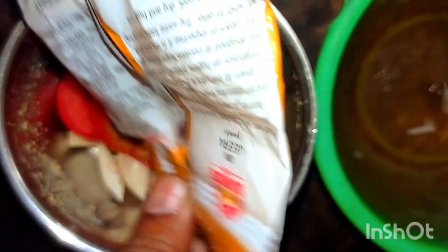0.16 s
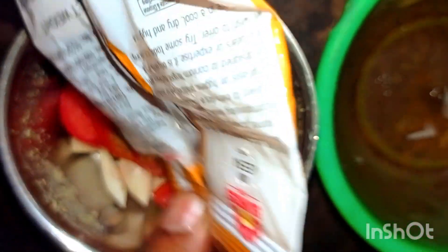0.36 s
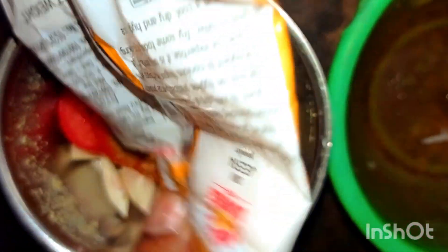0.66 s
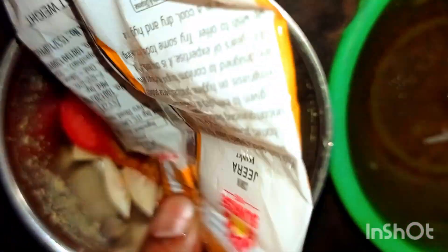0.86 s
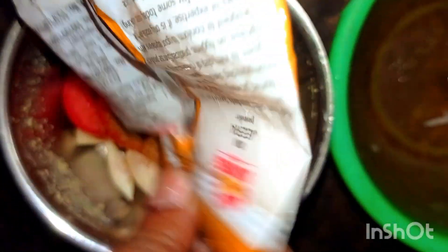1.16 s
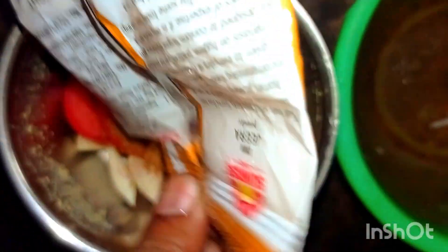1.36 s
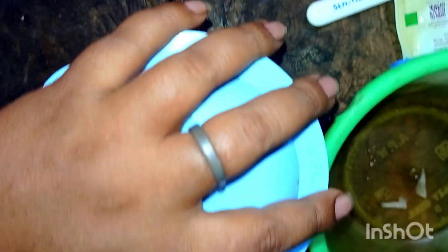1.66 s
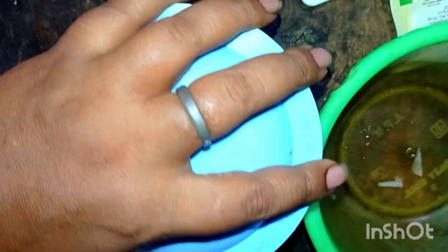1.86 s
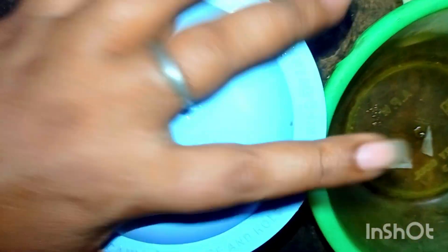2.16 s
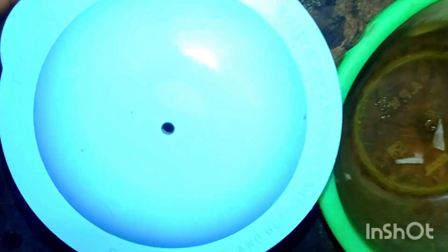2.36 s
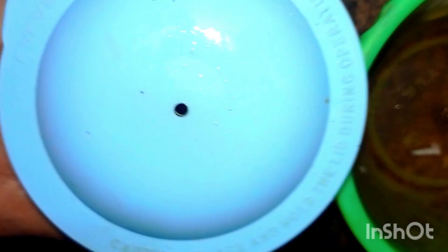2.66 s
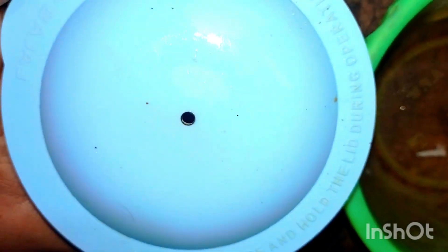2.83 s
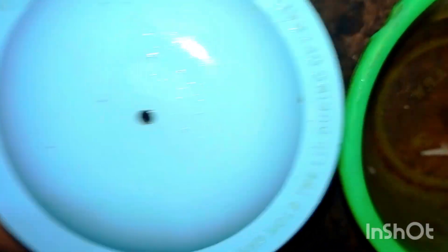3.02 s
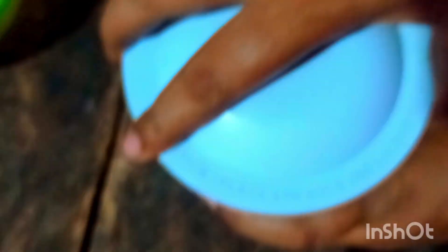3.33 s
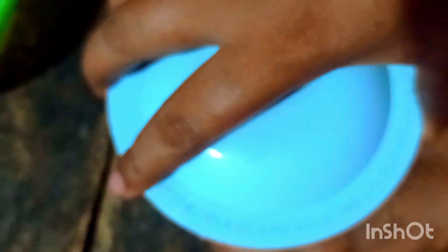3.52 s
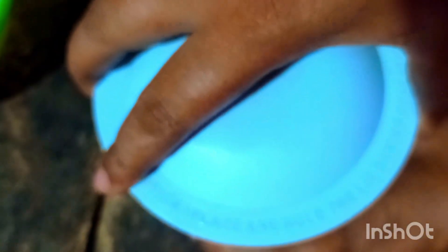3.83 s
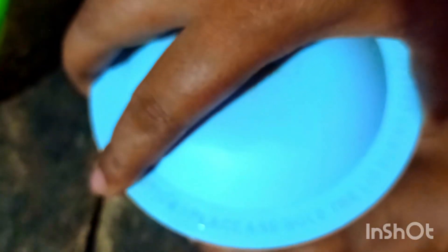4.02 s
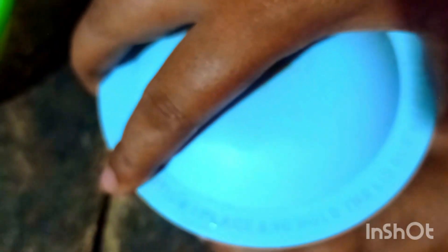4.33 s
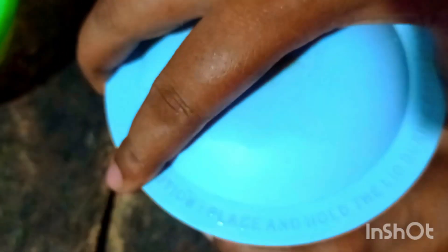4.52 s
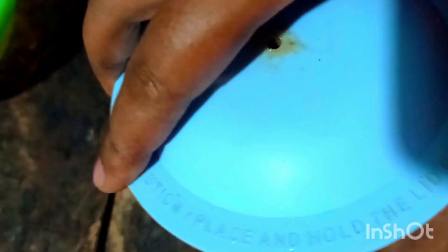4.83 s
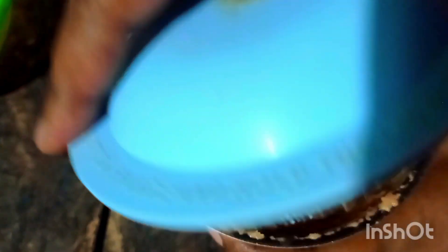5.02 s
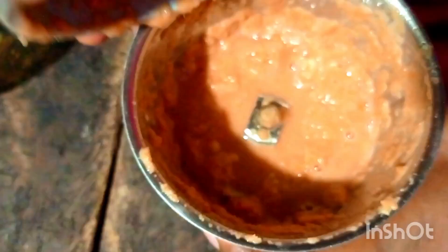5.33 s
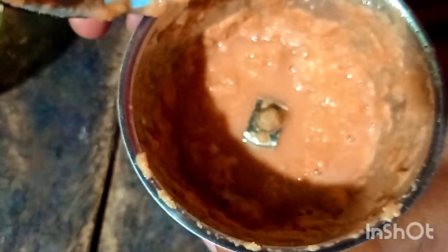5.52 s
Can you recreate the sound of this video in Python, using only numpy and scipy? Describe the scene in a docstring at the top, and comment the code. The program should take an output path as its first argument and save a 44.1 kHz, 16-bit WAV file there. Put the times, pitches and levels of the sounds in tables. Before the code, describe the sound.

A plastic packet crinkles as powder trickles out, then a plastic lid is knocked onto a steel jar and pulled off, over steady hiss.

```python
"""Spice packet and steel jar

A plastic packet is jiggled over a steel jar: its film buckles in snaps while powder trickles out.
A plastic lid is pressed on, the jar is shifted over a wooden board and the lid is pulled off again,
with ringing knocks, rim clicks and the friction of fingers. It is all heard close up in a small
kitchen with a steady hiss; halfway through, all sound stops for a moment and creeps back."""
import sys
import numpy as np
from scipy import signal
from scipy.fft import rfft, irfft
from scipy.io import wavfile
from scipy.ndimage import uniform_filter1d

SR = 44100
rng = np.random.default_rng(int(sys.argv[2]) if len(sys.argv) > 2 else 0)


def transcribe(u):
    """Save the signal u as a 16-bit wav file named by the first command-line argument.

    u: samples, shape (n,) or (channels, n), limited to [-1, 1]; the rate is SR.
    q: integer samples, one column per channel.
    """
    v = np.clip(np.atleast_2d(u).T, -1, 1)
    q = np.round(v * 32767).astype(np.int16)
    wavfile.write(sys.argv[1], SR, q)


N = 250620
TIME = np.arange(N) / SR
PAUSE_START_S, PAUSE_END_S = 3.044, 3.272


def amp(db):
    """Decibels to gain."""
    return 10 ** (np.asarray(db) / 20)


def unit_rms(x):
    """Scales to rms 1."""
    return x / np.sqrt(np.mean(x ** 2) + 1e-20)


def curve(points, hz):
    """Joins (frequency, value) points on a log-frequency axis."""
    point_hz, value = np.transpose(points)
    return np.interp(np.log(hz + 1), np.log(point_hz + 1), value)


def hump(hz, centre_hz, octaves):
    """A rounded peak in dB with straight skirts."""
    return -12 * (np.sqrt(1 + (np.log2((hz + 1) / centre_hz) / octaves) ** 2) - 1)


def add(mix, start_s, sound):
    """Lays a sound into the mix."""
    part = mix[max(round(start_s * SR), 0):][:len(sound)]
    part += sound[:len(part)]


def colour(x, shape, size=4096):
    """Causal EQ whose gain in dB is shape(hz)."""
    gain_db = np.maximum(shape(abs(np.fft.fftfreq(size, 1 / SR))), -100)
    minimum_phase = np.exp(np.conj(signal.hilbert(np.log(amp(gain_db)))))
    taps = np.fft.ifft(minimum_phase).real[:size // 2]
    return signal.fftconvolve(x, taps)[:len(x)]


def low_cut(x, hz, order):
    """High-pass filter."""
    return signal.sosfilt(signal.butter(order, hz, "highpass", fs=SR, output="sos"), x)


def noise(shape, count=N):
    """Coloured noise at rms 1."""
    return unit_rms(colour(rng.standard_normal(count), shape))


def grains(count, spread_db):
    """Noise of unequal tiny impacts."""
    sizes = amp(spread_db * np.minimum(rng.exponential(1, count // 32 + 1), 4))
    return rng.standard_normal(count) * np.repeat(sizes, 32)[:count]


def swell(peak_s, db, rise_s, fall_s):
    """Gain that rises smoothly to a peak and dies away."""
    t = TIME - peak_s
    depth = np.where(t < 0, .5 * (t / rise_s) ** 2, t / fall_s)
    return amp(db) * np.exp(-np.minimum(depth, 20))


def fuzzy_tone(hz, width_hz):
    """A sine roughened by a wandering phase."""
    drift = np.sqrt(2 * np.pi * abs(width_hz) / SR) * rng.standard_normal(len(hz))
    drift = uniform_filter1d(drift, max(int(SR / np.mean(width_hz) / 4), 1))
    return np.sqrt(2) * np.sin(np.cumsum(2 * np.pi * hz / SR + drift))


def flattened(burst):
    """Evens out a burst's spectrum, so that it cracks rather than rings."""
    spectrum = rfft(burst)
    return irfft(spectrum / (abs(spectrum) + 1e-9)) * np.linspace(1, 0, len(burst)) ** 4


def friction(peak_s, rise_s, fall_s, db, shape):
    """A grainy rub that swells and fades: its start time and its sound."""
    t = np.arange(-SR // 4, SR // 4) / SR
    grit = unit_rms(colour(grains(len(t), spread_db=1.74), shape))
    envelope = np.exp(-.5 * (t / np.where(t < 0, rise_s, fall_s)) ** 2)
    return peak_s + t[0], amp(db) * grit * envelope


def plastic_band(hz, centre_hz, octaves):
    """A band in dB, dulled because plastic gives little above 8 kHz."""
    rolloff = [(7200, .5), (8400, -11.5), (10000, -10.5), (13000, -26.5), (15200, -11), (16500, -15)]
    return hump(hz, centre_hz, octaves) + curve(rolloff, hz)


# Tone of the hiss before and after the pause, and of the room rumble: freq_hz, gain_db
HISS_EARLY_EQ = [(500, -12.5), (1300, -16.5), (1900, -12), (2600, -1), (3600, -1), (5000, -2.5), (6700, -1),
                 (8200, -13.5), (10000, -22), (12500, -43.5), (14000, -42.5), (15200, -32), (16500, -35)]
HISS_LATE_EQ = [(500, -5), (900, -5.5), (2100, -6.5), (2750, 7), (3100, 0), (3800, 7), (4900, -0.5),
                (6400, 7), (8300, -5.5), (10000, -12), (12500, -34), (14000, -35.5), (15200, -18.5),
                (16500, -31.5)]
RUMBLE_EQ = [(20, -26.5), (40, -19), (60, -1.5), (90, 5.5), (150, -2), (220, -5.5), (295, -3.5), (350, -11),
             (430, -0.5), (600, -28.5), (1200, -41)]


def room_tone(flicker_db=4):
    """A bed of finely flickering hiss over low rumble; the hiss is softer after the pause."""
    _, _, spectrum = signal.stft(rng.standard_normal(N), SR, nperseg=512)
    patches = uniform_filter1d(rng.standard_normal(spectrum.shape), size=2, axis=0)
    patches = unit_rms(uniform_filter1d(patches, size=4, axis=1))
    hiss = signal.istft(spectrum * amp(flicker_db * patches), SR, nperseg=512)[1][:N]
    early = unit_rms(colour(hiss, lambda f: curve(HISS_EARLY_EQ, f)))
    late = unit_rms(colour(hiss, lambda f: curve(HISS_LATE_EQ, f)))
    rumble = noise(lambda f: curve(RUMBLE_EQ, f))
    return np.where(TIME < PAUSE_START_S,
                    amp(-49) * early + amp(-64) * rumble,
                    amp(-55.5) * late + amp(-61.5) * rumble)


# Tone of the sliding powder: freq_hz, gain_db
POWDER_EQ = [(100, -40.5), (300, -2), (600, -5.5), (900, -5), (1400, -4), (2400, 3.5), (6600, 2),
             (8500, -5.5), (13000, -24), (15200, -9.5), (16500, -36.5)]
# One trickle per shake: peak_s, level_db
POURS = [(0.01, -42), (.27, -45), (.63, -48.5), (1.02, -55)]


def powder():
    """Fine grains slide down the film after each shake."""
    flow = sum(swell(peak_s, db, rise_s=.038, fall_s=.22) for peak_s, db in POURS)
    return flow * unit_rms(colour(grains(N, spread_db=4.5), lambda f: curve(POWDER_EQ, f)))


# The film buckles: start_s, level_db, flap_hz, crease_hz
SNAPS = [(0.0214, -31.5, 1030, 5700), (0.06, -34.5, 900, 2110), (0.109, -36.5, 1490, 6500),
         (0.1338, -36, 1120, 6300), (0.1716, -35.5, 900, 6300), (0.184, -32.5, 860, 6350),
         (0.222, -38, 900, 2770), (0.264, -47, 1450, 2470), (0.29, -35.5, 1100, 6330),
         (0.33, -33.5, 1100, 6400), (0.349, -32.5, 840, 5500), (0.3925, -38, 900, 2090),
         (0.429, -37, 540, 6310), (0.453, -35, 1080, 6500), (0.478, -24, 1490, 2050),
         (0.4833, -31, 1060, 5500), (0.526, -39, 1120, 5900), (0.5307, -26.5, 880, 6540),
         (0.571, -37, 900, 2960), (0.612, -36.5, 1080, 5650), (0.6254, -22, 1490, 2170),
         (0.6506, -42, 1290, 2790), (0.6973, -36, 840, 6500), (0.7019, -32, 930, 6500),
         (0.712, -32, 800, 6550), (0.737, -26, 690, 6740), (0.7903, -27, 1060, 2960),
         (0.85, -40.5, 615, 3200), (0.8578, -39.5, 1120, 6400), (0.9526, -26.5, 1080, 2950),
         (1.019, -35.5, 1270, 5700), (1.0283, -36.5, 1100, 3110), (1.1274, -24.5, 990, 7300),
         (1.1877, -30.5, 860, 6500), (1.2984, -25.5, 1060, 3700)]
# Ring of the film and the crackle on top: freq_hz, gain_db
FILM_EQ = [(1100, -7), (1750, -7.5), (2300, 0), (2900, 1), (3500, -3.5), (4150, -9.5), (4800, -2),
           (5900, -3), (7000, 1), (8200, -24), (11000, -43.5)]
CRACKLE_EQ = [(6000, -27), (8000, -1.5), (10000, -8), (13000, -17), (15200, -15.5), (16500, -6.5)]


def packet(usual_db=-34.5, flap_decay_s=.002106, ripple_db=3.5, wear_db_per_s=10):
    """Each buckle rings a crease and flaps the wider sheet; harder ones are shorter and brighter."""
    out, t = np.zeros(N), np.arange(2048) / SR
    trim = np.sqrt(.008 * SR / len(t))  # a snap carries the energy of 8 ms at its level
    fold_hz = np.geomspace(1000, 16000, 24)
    for start_s, db, flap_hz, crease_hz in SNAPS:
        force_db = db - usual_db
        length_s = .0019 * amp(-.24 * force_db)
        flap_db = -7 - .65 * force_db  # the flap falls behind as the force grows
        crackle_db = -14 + force_db - wear_db_per_s * start_s  # duller as the creases wear in
        attack = t / length_s * np.exp(-(t / (.55 * length_s)) ** 2)
        envelope = attack + .06 * np.exp(-t / (2 * length_s))
        crease_burst, sheet_burst, crackle_burst = rng.standard_normal((3, len(t))) * envelope
        fold_eq = np.c_[fold_hz, ripple_db * rng.standard_normal(len(fold_hz))]  # each fold's own tone
        crease = colour(flattened(crease_burst),
                        lambda f: curve(FILM_EQ, f) + curve(fold_eq, f) + 4 * amp(hump(f, crease_hz, .15)))
        sheet = colour(sheet_burst, lambda f: hump(f, flap_hz, .38))
        flap_note = np.sin(2 * np.pi * flap_hz * t) * t * np.exp(-t / flap_decay_s)
        flap = unit_rms(1.16 * unit_rms(sheet) + unit_rms(flap_note))
        crackle = colour(crackle_burst, lambda f: curve(CRACKLE_EQ, f) + curve(fold_eq, f))
        snap = amp(-1) * unit_rms(crease) + amp(flap_db) * flap + amp(crackle_db) * unit_rms(crackle)
        add(out, start_s, amp(db) * trim * snap)
        add(out, start_s + .0135, amp(db - 26) * trim * flap)  # the sheet flaps back
    return out


# The hands rock the jar: peak_s, level_db, centre_hz, fall_s
ROCKS = [(.06, -58.5, 147, .2), (.46, -48.5, 131, .16), (.72, -59.5, 143, 0.19), (.98, -54.5, 117, 0.086),
         (1.18, -51.5, 115, 0.091), (1.45, -62.5, 109, 0.1), (1.74, -50.5, 150, 0.14),
         (1.87, -52, 157, 0.091), (2.33, -45, 152, 0.026), (4.02, -56.5, 102, 0.042),
         (4.56, -50.5, 118, .06), (5.41, -47.5, 107, 0.055)]


def board_booms(rise_s=.025, octaves=.29):
    """The board booms softly each time the jar rocks on it."""
    return sum(swell(peak_s, db, rise_s, fall_s) * noise(lambda f: hump(f, centre_hz, octaves))
               for peak_s, db, centre_hz, fall_s in ROCKS)


# The jar shifts: peak_s, rise_s, fall_s, level_db, tilt_db_per_octave
SCRAPES = [(0.689, 0.024, 0.02, -46.5, 1), (1.838, .031, .032, -45.5, 3.5), (2.64, 0.034, 0.03, -51, -3),
           (3.449, .013, 0.11, -59, -3.5), (3.852, 0.0065, 0.063, -40, 0.5),
           (4.588, 0.017, 0.037, -43, -3.5), (5.274, 0.032, 0.033, -50.5, 2)]
# Tone of steel on wood: freq_hz, gain_db
SCRAPE_EQ = [(100, -26), (220, -6.5), (370, 1.5), (600, -7), (900, -9), (1300, -14.5), (2200, -18),
             (4000, -22), (8000, -45.5), (16000, -72.5)]


def jar_scrapes(knee_hz=600):
    """The jar scrapes low on the wood, each move with its own brightness above the knee."""
    out = np.zeros(N)
    for peak_s, rise_s, fall_s, db, tilt in SCRAPES:
        shape = lambda f: curve(SCRAPE_EQ, f) + tilt * np.log2(np.maximum(f / knee_hz, 1))
        add(out, *friction(peak_s, rise_s, fall_s, db, shape))
    return out


def cavity_hum(lid_on_s=1.27, pitch_hz=287, level_db=-64.5):
    """The air under the closed lid hums faintly while the hand rests on it."""
    resting = (TIME > lid_on_s) & (TIME < PAUSE_END_S)
    envelope = uniform_filter1d(resting * 1., size=2000)
    return amp(level_db) * envelope * fuzzy_tone(np.full(N, pitch_hz), width_hz=30)


def finger_ticks(per_s=22, gain_db=-51, spread_db=3, decay_s=.00079):
    """After the last snap, fingertips stick and let go on the lid in tiny ticks."""
    sizes = amp(spread_db * np.minimum(rng.exponential(1, N), 3))
    ticks = sizes * (rng.random(N) < per_s / SR) * (TIME > SNAPS[-1][0])
    t = np.arange(SR // 50) / SR
    slip = rng.standard_normal(len(t)) * np.exp(-t / decay_s)
    slips = signal.fftconvolve(ticks, slip)[:N]
    return amp(gain_db) * colour(slips, lambda f: plastic_band(f, 5700, octaves=1.2))


# A finger sings on the lid, one list per stroke: time_s, pitch_hz, width_hz, level_db
DRAGS = [
    [(1.33, 394, 90, -66), (1.4, 430, 50, -49), (1.45, 515, 94, -54), (1.52, 598, 145, -50),
     (1.64, 744, 200, -66.5)],
    [(1.65, 5360, 600, -60), (1.69, 5500, 600, -48), (1.74, 6180, 514, -51.5), (1.79, 6260, 500, -54)],
    [(2.915, 4840, 90.5, -51), (2.932, 5050, 19, -42.5), (2.975, 5150, 90, -48.5), (3.0, 5520, 310, -48),
     (3.035, 5830, 570, -57)],
]


def finger_drags():
    """Stick and slip under a finger, rising in pitch as it speeds up."""
    out = np.zeros(N)
    for stroke in DRAGS:
        times, *columns = np.transpose(stroke)
        t = np.arange(times[0], times[-1], 1 / SR)
        hz, width_hz, db = (np.interp(t, times, column) for column in columns)
        add(out, times[0], amp(db) * fuzzy_tone(hz, width_hz) * signal.windows.tukey(len(t), .1))
    return out


# Skin swishes over the lid: peak_s, fall_s, level_db, centre_hz, spread_octaves
BRUSHES = [(1.443, 0.013, -46, 5430, 2.3), (1.829, 0.023, -38.5, 6100, 0.99),
           (2.077, 0.09, -51.5, 2320, 0.36), (2.209, 0.038, -49.5, 3640, 1.5),
           (2.435, 0.01, -50.5, 8900, 0.34), (2.529, 0.027, -51, 9100, 1.45),
           (3.401, 0.016, -51.5, 8050, 1.8), (3.939, 0.02, -47.5, 3130, 1.2), (4.238, .016, -50, 3600, .69),
           (4.529, .029, -54.5, 4050, 0.23), (5.091, 0.0095, -65.5, 11000, 0.41)]


def skin_brushes(rise_share=.65):
    """Skin brushes high on the plastic, swelling faster than it fades."""
    out = np.zeros(N)
    for peak_s, fall_s, db, centre_hz, octaves in BRUSHES:
        shape = lambda f: plastic_band(f, centre_hz, octaves)
        add(out, *friction(peak_s, rise_share * fall_s, fall_s, db, shape))
    return out


# The grip shifts on the jar: peak_s, level_db
TOUCHES = [(1.45, -64), (2.02, -63.5), (3.5, -61.5), (3.94, -54), (4.25, -61.5), (4.73, -61), (4.87, -66),
           (5.22, -54.5), (5.41, -73)]


def jar_ring(pitch_hz=1085, held_db=-76):
    """Each touch rings one narrow resonance of the steel, over the faint hum of holding it."""
    touches = sum(swell(peak_s, db, rise_s=.018, fall_s=.07) for peak_s, db in TOUCHES)
    return (amp(held_db) + touches) * noise(lambda f: hump(f, pitch_hz, octaves=.0498))


# Modes of the lid on the jar, before the grip damps them: pitch_hz, gain_db, base_t60_s
LID_MODES = [(96, -17.5, 0.08), (141.7, 8, 0.14), (232.2, 2.5, 0.19), (279, -4, 0.22), (322.5, -12, 0.052),
             (430, 7.5, 0.044), (493, 6, 0.061), (598, 1, 0.15), (760, 0, 0.05), (900, 10, 0.065),
             (1080, -29, 0.32), (1370, 5, 0.013), (2175, -21.5, 0.068)]
# Soft blows on lid and jar: start_s, peak_db, centre_hz, spread_octaves
KNOCKS = [(1.773, -30.5, 518, 0.23), (1.838, -23.5, 424, 1.2), (2.181, -15, 387, 1.15),
          (2.2, -23, 145, 0.54), (2.239, -26.5, 147, 0.52), (2.591, -36, 135, 0.43), (2.625, -22, 285, 0.7),
          (2.647, -31.5, 170, 1.23), (4.746, -25, 520, 1.34), (4.757, -21, 296, 0.53),
          (4.81, -22, 253, 0.43), (4.826, -28.5, 139, 0.18)]


def lid_knocks(push_db=-3, rattle_db=-9, rattle_s=.028):
    """A blow pushes the board once, rattles the jar and rings the lid modes near its centre."""
    out, t = np.zeros(N), np.arange(SR // 2) / SR
    hz, mode_db, t60 = np.transpose(LID_MODES)[:, :, None]
    polarity = (-1) ** np.arange(len(hz))[:, None]
    for start_s, db, centre_hz, octaves in KNOCKS:
        ring_share = .46 * (298 / centre_hz) ** .74  # a higher blow means a tighter, damping grip
        band = lambda f: hump(f, centre_hz, octaves)
        envelopes = amp(mode_db + band(hz) - 60 * t / (t60 * ring_share))
        ring = (polarity * envelopes * np.sin(2 * np.pi * hz * t)).sum(0)
        push = colour(1. * (t == 0), band)
        rattle = colour(rng.standard_normal(len(t)) * np.exp(-t / rattle_s), band)
        blow = unit_rms(ring) + amp(push_db) * unit_rms(push) + amp(rattle_db) * unit_rms(rattle)
        soft_hz = 3 * centre_hz  # the soft contact gives nothing much higher
        blow = colour(blow, lambda f: hump(np.maximum(f, soft_hz), soft_hz, .29))
        add(out, start_s, amp(db) * blow / abs(blow).max())
    return out


# The rim clicks on steel, skin squeaks on plastic: start_s, level_db, centre_hz, spread_octaves, t60_s
RIM_CLICKS = [(1.838, -22, 4300, 1.3, 0.037), (1.847, -25, 3200, 0.76, 0.042),
              (2.116, -30, 4416, .8, 0.033), (2.189, -25, 3010, 1.34, 0.11),
              (4.7485, -20, 2600, 0.88, 0.039), (4.997, -31, 2480, 0.6, 0.035)]
SKIN_SQUEAKS = [(2.431, -34.5, 3050, 0.064, 0.09), (2.712, -30.5, 6490, 0.13, 0.19),
                (3.713, -33.5, 5700, 0.12, 0.12), (4.715, -33, 3050, 0.29, 0.35),
                (4.913, -34.5, 3870, 0.13, 0.13)]


def lid_slips(slips, rise_s):
    """Quick slips die away in a band of the lid: wide bands click, narrow ones squeak."""
    out, t = np.zeros(N), np.arange(SR // 4) / SR
    for start_s, db, centre_hz, octaves, t60 in slips:
        band = noise(lambda f: plastic_band(f, centre_hz, octaves), len(t))
        envelope = amp(db - 60 * t / t60) * (1 - np.exp(-t / rise_s))
        add(out, start_s, envelope * band / 2)
    return out


# Slaps off the jar wall and the board: delay_s, relative_db
BOUNCES = [(.0017, 4), (.0031, 0.5), (.0046, -11)]


def kitchen(x, tail_db=-11, bounce_db=-10.5):
    """Close surfaces throw the sound straight back, then the small room adds a short tail."""
    t60_by_hz = [(200, .29), (1000, .18), (4000, .098), (9000, .17), (16000, .03)]
    t = np.arange(SR // 2) / SR
    reflections = rng.standard_normal(len(t)) * (rng.random(len(t)) < .1) * (t > .004)
    hz, age_s, spectrum = signal.stft(reflections, SR, nperseg=256)
    decay = amp(-60 * age_s / curve(t60_by_hz, hz)[:, None])
    tail = signal.istft(spectrum * decay, SR, nperseg=256)[1][:len(t)]
    response = amp(tail_db) * tail / np.linalg.norm(tail)
    for delay_s, db in BOUNCES:
        scatter = rng.standard_normal(25)
        add(response, delay_s, amp(bounce_db + db) * scatter / np.linalg.norm(scatter))
    return signal.fftconvolve(x, response)[:N]


def scene():
    """Packet, lid and handling feed the kitchen reverb; the quiet layers stay dry."""
    film = low_cut(packet(), hz=456, order=3)  # a thin sheet radiates no bass
    lid = low_cut(lid_knocks(), hz=60, order=2)
    lid += lid_slips(RIM_CLICKS, rise_s=.00055) + lid_slips(SKIN_SQUEAKS, rise_s=.0041)
    handling = jar_scrapes() + skin_brushes() + finger_drags() + finger_ticks()
    reverb = kitchen(film + .5 * lid + handling)
    quiet_layers = powder() + board_booms() + jar_ring() + cavity_hum() + room_tone()
    return (film + lid + handling + reverb + quiet_layers)[None]


def record(dry):
    """All sound drops out for a moment and creeps back; the top is cut at 16.1 kHz."""
    since_pause_s = np.maximum(TIME - PAUSE_END_S, 0)
    fade_in = amp(-19.5 * np.exp(-since_pause_s / .17)) * (TIME > PAUSE_END_S)
    fader = uniform_filter1d((TIME < PAUSE_START_S) + fade_in, size=200)
    high_cut = signal.firwin(255, 16100, window=("kaiser", 8), fs=SR)
    return signal.oaconvolve(dry * fader, high_cut[None], "same")


dry = scene()
out = record(dry)
transcribe(out)
```